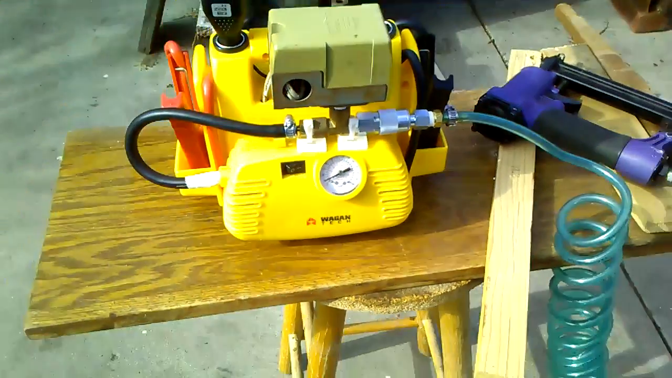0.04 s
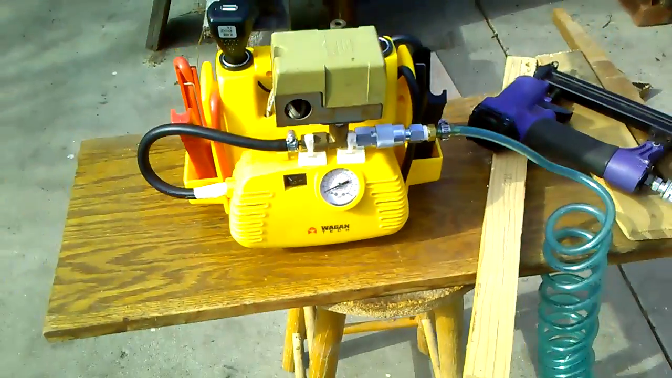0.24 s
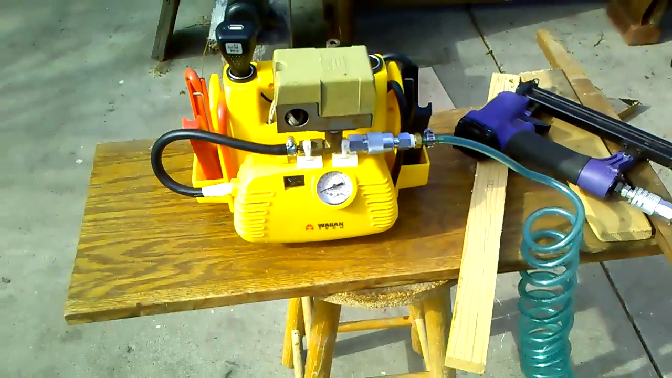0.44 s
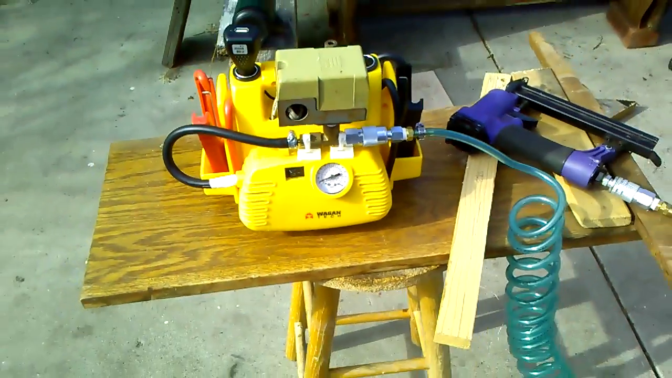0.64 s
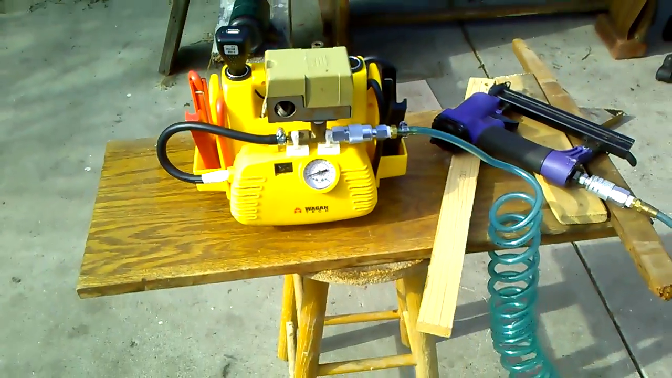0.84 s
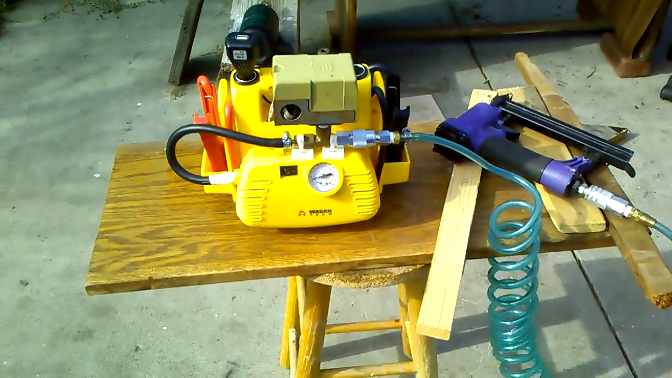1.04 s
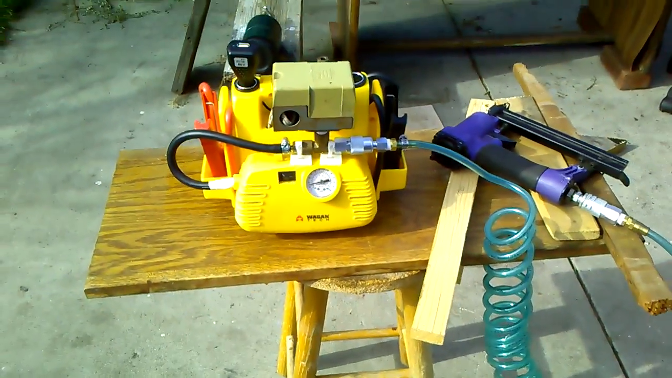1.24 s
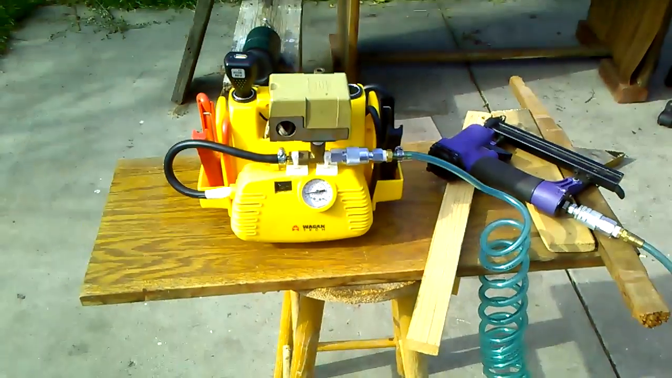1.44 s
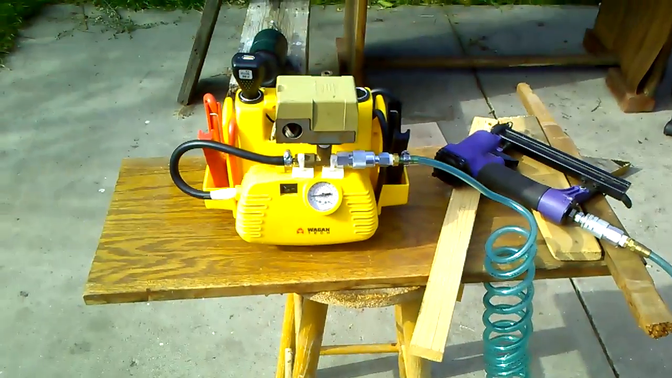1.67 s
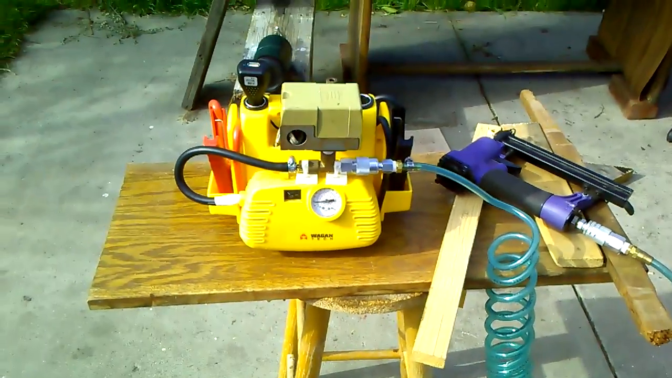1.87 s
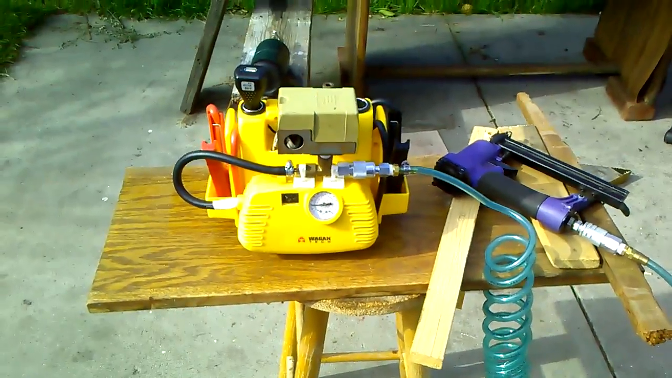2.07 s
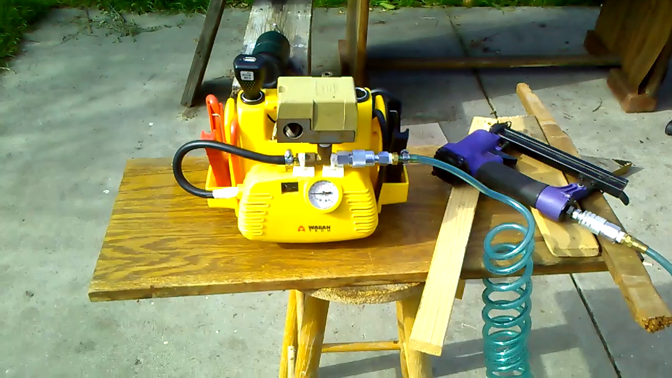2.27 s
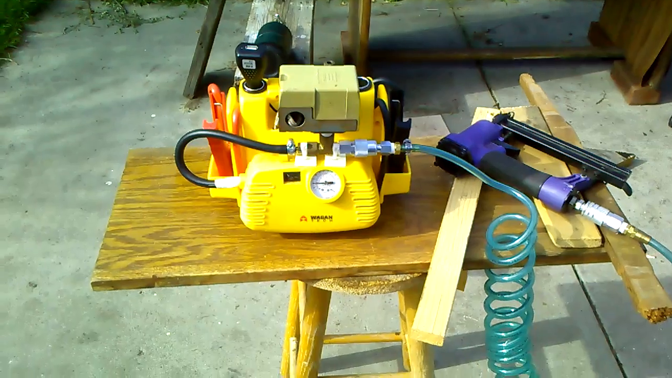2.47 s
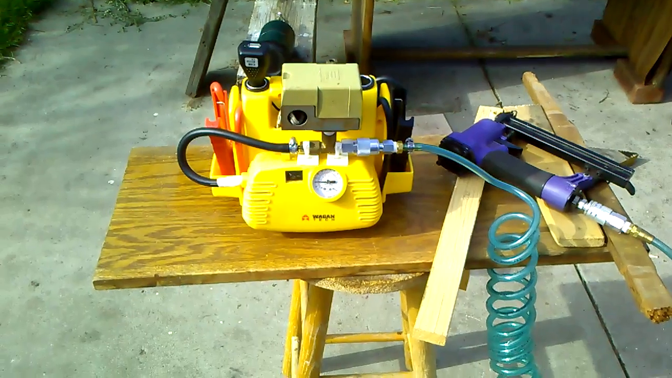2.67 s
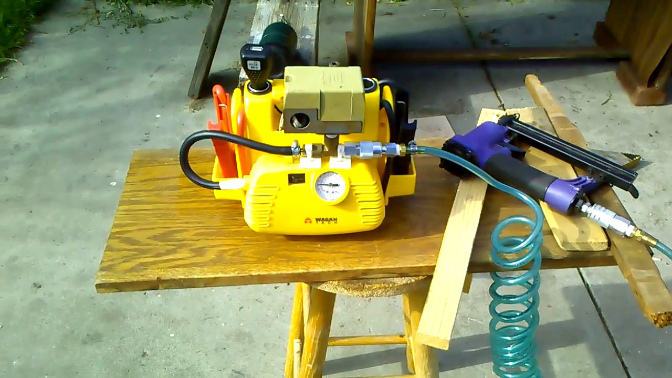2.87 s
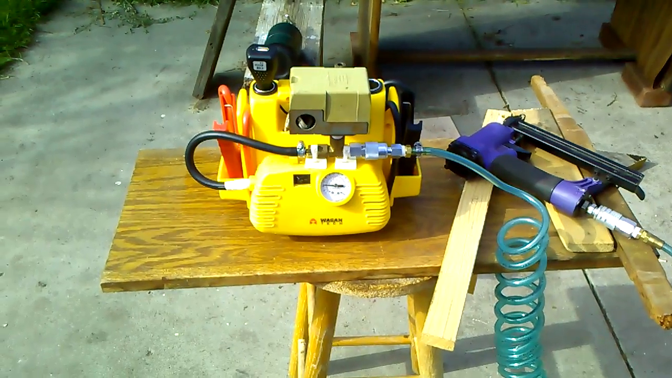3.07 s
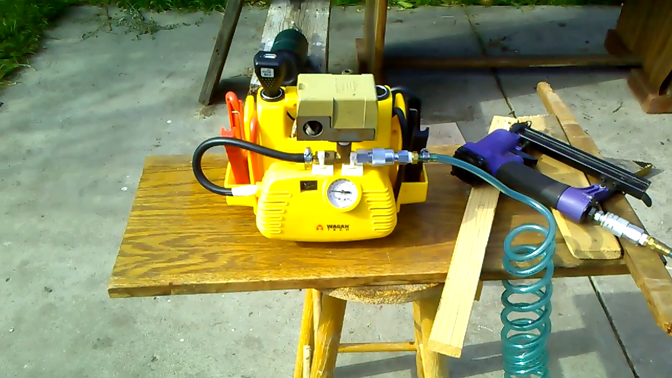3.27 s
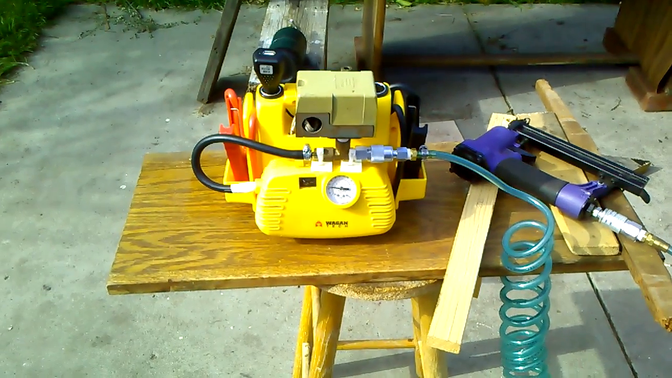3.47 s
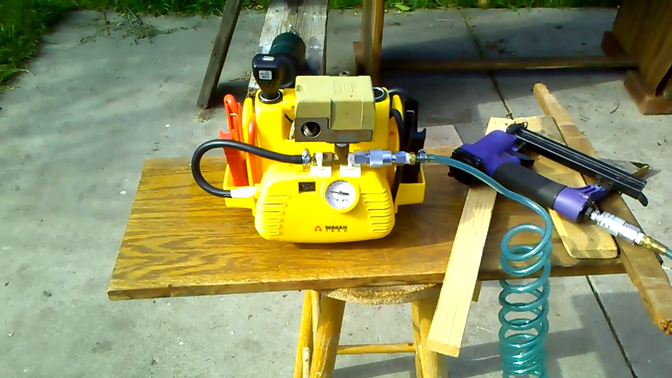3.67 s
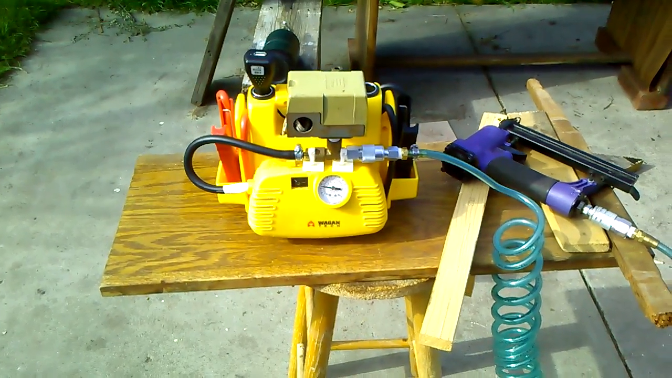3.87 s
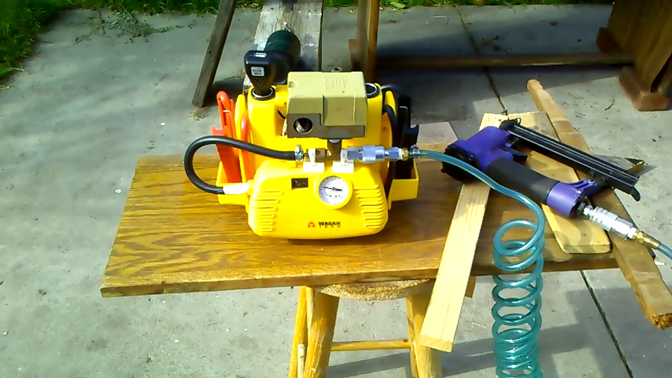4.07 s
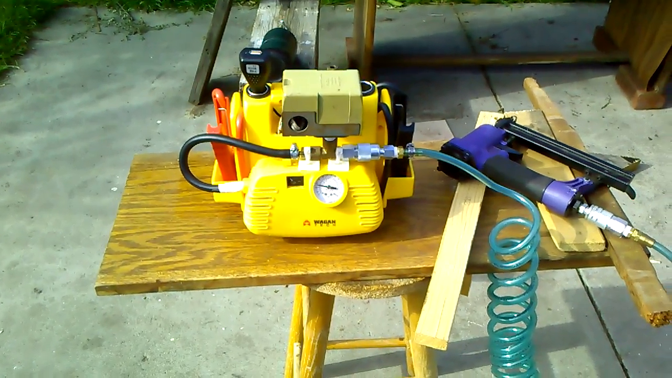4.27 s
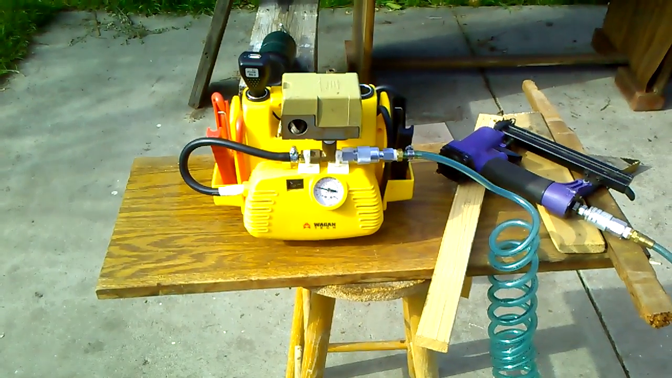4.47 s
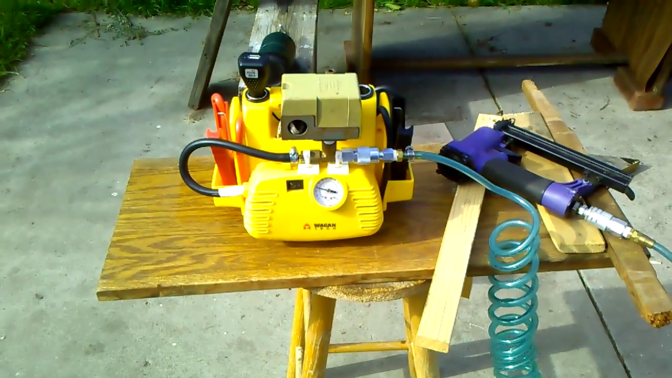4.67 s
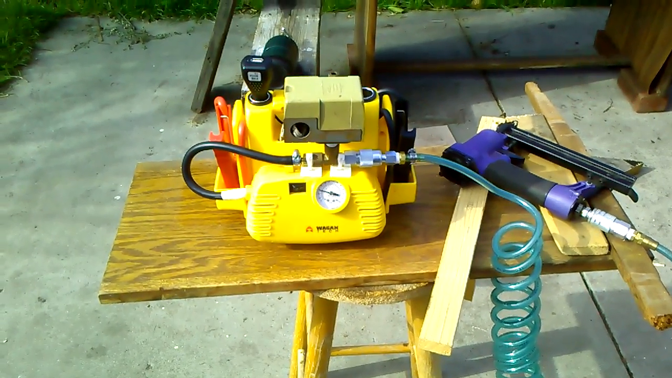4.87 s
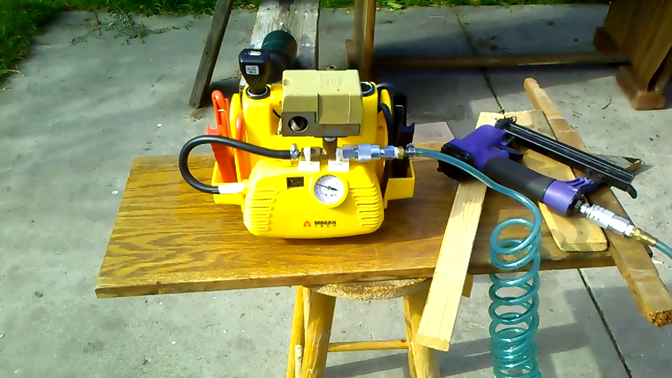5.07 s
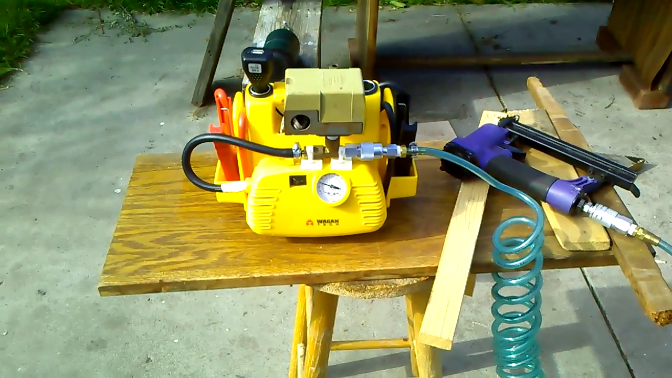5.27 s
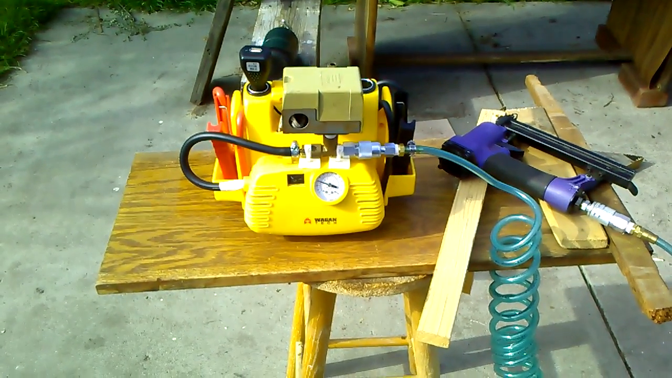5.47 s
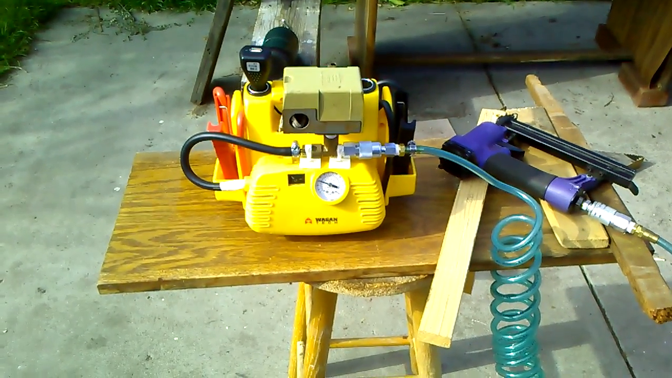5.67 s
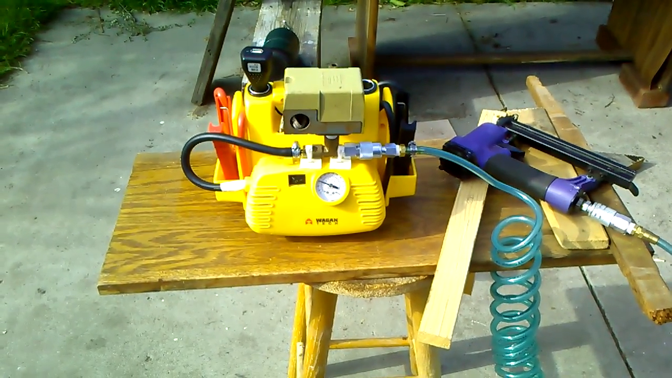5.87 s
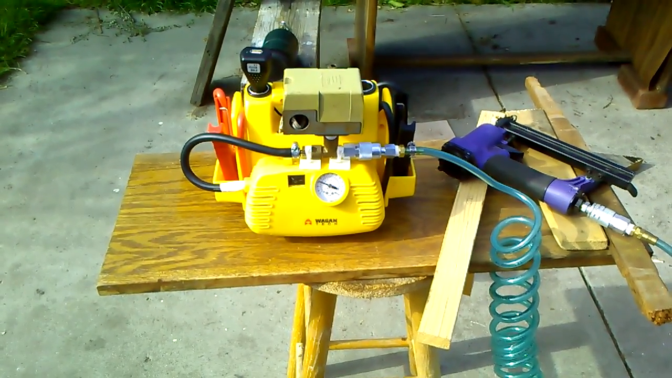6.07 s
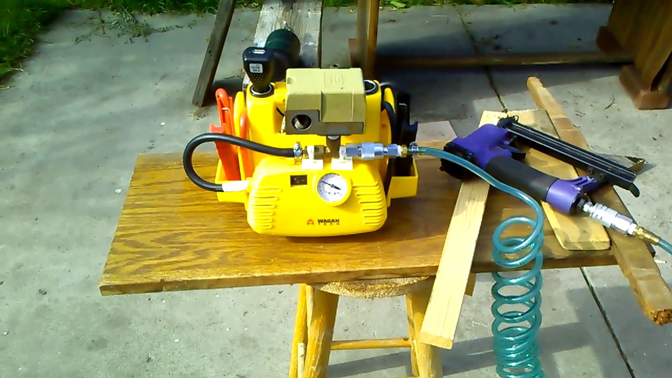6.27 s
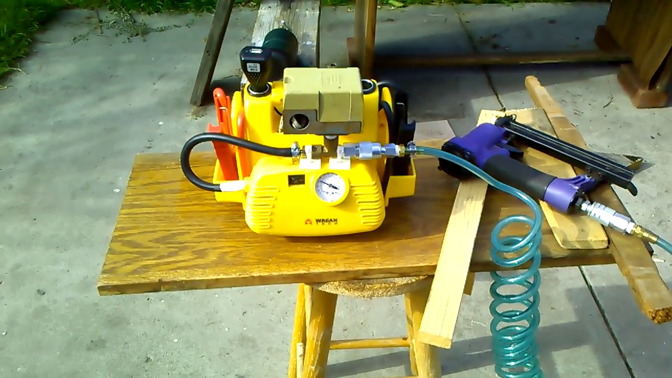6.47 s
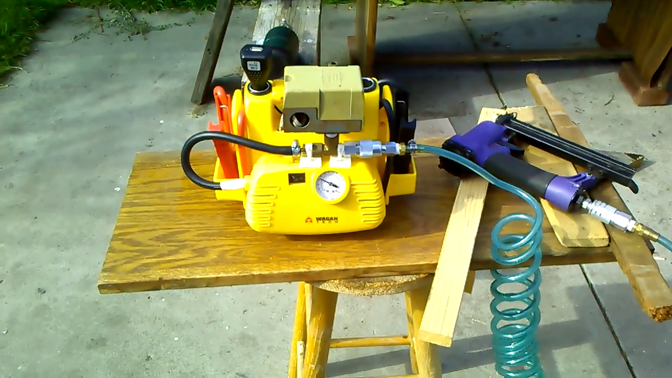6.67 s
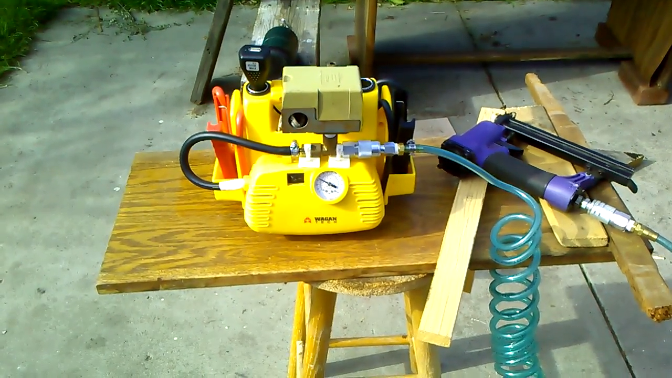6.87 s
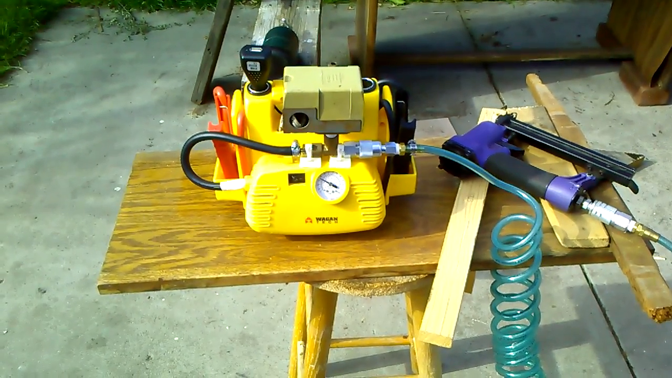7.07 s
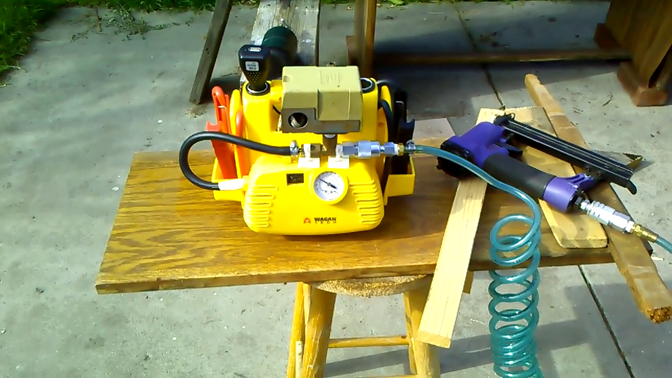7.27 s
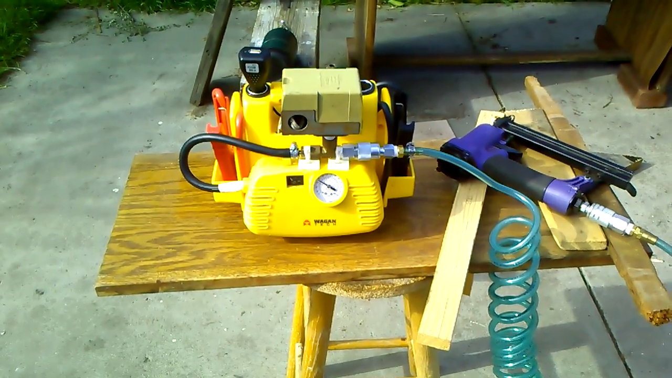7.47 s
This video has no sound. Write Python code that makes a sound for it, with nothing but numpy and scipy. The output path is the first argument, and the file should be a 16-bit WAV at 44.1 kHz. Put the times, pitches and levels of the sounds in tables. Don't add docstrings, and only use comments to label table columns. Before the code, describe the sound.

Outdoors, a little geared compressor runs nonstop with a rapid clacking drone, hollow knocking and gear whine, slowing slightly as pressure builds.

```python
import sys
import numpy as np
from scipy import signal
from scipy.fft import rfft, irfft
from scipy.io import wavfile
from scipy.ndimage import uniform_filter1d

SR = 44100
rng = np.random.default_rng(int(sys.argv[2]) if len(sys.argv) > 2 else 0)


def persist_wave(psi):
    counts = np.round(np.clip(psi, -1, 1) * 32767).astype(np.int16)
    wavfile.write(sys.argv[1], SR, np.atleast_2d(counts).T)


def volts_from_decibels(level):
    exponent = np.asarray(level, float) / 20
    return 10 ** exponent


N = 332514
T = np.arange(N) / SR
TEETH, RATIO, POLES = 48, 4.8, 3


def evened(x):
    return x / np.sqrt(np.mean(x ** 2) + 1e-20)


def steadied(x):
    power = uniform_filter1d(uniform_filter1d(x ** 2, size=9000), size=9000)
    return x / np.sqrt(power + 1e-20)


def over_time(rows):
    s, value = np.transpose(rows)
    return np.interp(T, s, value)


def over_pitch(points, hz):
    f, db = np.transpose(points)
    return np.interp(np.log(hz + 1), np.log(f + 1), db)


def colour(x, db):
    log_gain = np.log(volts_from_decibels(np.maximum(db, -100)))
    whole = np.r_[log_gain, log_gain[-2:0:-1]]
    taps = np.fft.ifft(np.exp(whole - 1j * signal.hilbert(whole).imag)).real
    return signal.oaconvolve(x, taps[:2048])[:N]


def swell(t, rise_ms, fall_ms):
    return np.exp(-.5 * (1000 * t / np.where(t < 0, rise_ms, fall_ms)) ** 2)


def per_turn(passing, spread):
    return spread * rng.standard_normal(400)[passing]


# (time [s], speed [turns/s])
SPEED = [
    (0, 45.73),
    (.9, 44.712),
    (2.2, 43.462),
    (3, 42.886),
    (4, 42.204),
    (5.1, 41.524),
    (6, 41.156),
    (6.8, 40.734),
    (7.54, 40.848),
]


def crank():
    speed = over_time(SPEED)
    return .354 + np.cumsum(speed) / SR, speed


def state():
    speed = uniform_filter1d(over_time(SPEED), size=20000, mode="nearest")
    pressure = (speed[0] - speed) / (speed[0] - speed.min())
    late = np.clip((pressure - .8) / (1 - .8), 0, 1)
    slack = np.clip(np.minimum(T - 2.3, 6.55 - T) / .2 + .5, 0, 1)
    return pressure, late, slack


def rule(start, pressure=0, late=0, slack=0):
    return start + np.dot((pressure, late, slack), state())


def valve_delay():
    return rule(-.01, pressure=.012, late=.053)


def since(turns, speed, angle, jitter):
    passing = np.round(turns - angle).astype(int)
    off = per_turn(passing, jitter)
    return passing, (turns - angle - passing - off) / speed


# (time [s], peak level [dB])
GUSTS = [
    (1.619, -49),
    (2.349, -43),
    (3.129, -39),
    (4.049, -45),
    (4.719, -47),
    (5.739, -44),
    (6.202, -45),
]


def wind():
    band = signal.butter(2, [11, 60], "band", fs=SR, output="sos")
    rumble = evened(signal.sosfilt(band, rng.standard_normal(N)))
    puffs = sum(volts_from_decibels(db - 6.5) * np.exp(-.5 * ((T - s - .025) / 0.019) ** 2) for s, db in GUSTS)
    lumps = evened(signal.resample(rng.standard_normal(40), N))
    return rumble * (puffs + volts_from_decibels(-62 + 3.5 * lumps))


# (order [cycles/turn], level [dB rms])
SHAKE = [(1, -60.5), (2, -62.5), (3, -63.5), (4, -64.5), (5, -67.5), (6, -67.5), (7, -58), (8, -58)]
# (frequency [Hz], level [dB per Hz])
ROAR = [(15, -16), (30, -8), (100, -8), (170, -4.5), (380, -3.5), (550, 9), (750, 9), (900, -1.5),
        (1300, -5.5), (1800, -37)]


def ground(turns):
    shake = sum(volts_from_decibels(db) * np.sqrt(2) * np.cos(2 * np.pi * order * turns) for order, db in SHAKE)
    roar = colour(rng.standard_normal(N), over_pitch(ROAR, np.fft.rfftfreq(4096, 1 / SR)))
    roar_db = -39 + 3.5 + 5 * np.exp(-T / 0.27)
    return shake + volts_from_decibels(roar_db) * evened(roar)


# (angle after the delay [turns], frequency [Hz], level [dB], t60 [ms])
PLATE = [
    (0.0367, 866, -1.5, 59),
    (0.0276, 1030, -3.5, 80),
    (0.0388, 1197, 5, 20),
    (0.1017, 1372, 10.5, 11.6),
    (-0.0045, 1720, 7, 33.7),
    (-0.0204, 2300, 9, 20.3),
]


def plate(turns, speed):
    out = np.zeros(N)
    delay = valve_delay()
    for angle, hz, db, t60_ms in PLATE:
        passing, t = since(turns, speed, angle + delay, .0009)
        size = volts_from_decibels(db + per_turn(passing, 0.8) - 60000 * abs(t) / t60_ms)
        attack = (t > 0) * (1 - np.exp(-abs(t) / 0.00038))
        out += size * attack * np.sin(2 * np.pi * hz * t)
    passing, t = since(turns, speed, 0.594, 0.00096)
    thin_level = 1.1 * volts_from_decibels(-3.5 * T) * np.exp(-.5 * (t / 0.006) ** 2)
    phase = 4 * np.pi * TEETH * (turns - passing) + per_turn(passing, .7)
    return evened(out) + thin_level * np.cos(phase)


# (angle after the delay [turns], dull level [dB], bright level [dB], ring-out [ms])
VALVE = [
    (-.025, 4, -2, .9),
    (.04, 0, -3, .9),
    (.085, -6, 1, 1.4),
    (.15, -9, -5, 2),
]
# (angle after the rebound [turns], dull level [dB], bright level [dB], ring-out [ms])
REBOUND = [
    (0, -18, -3, 1.2),
    (.04, -18, 0, 1.6),
    (.09, -18, -5, 2),
]
# (angle [turns], dull level [dB], bright level [dB], ring-out [ms])
ROD = [
    (.36, -8, -15, 1.3),
    (.5, -11, -22, 1.6),
    (.62, -9, -21, 1.8),
    (.76, -9, -25, 1.5),
]
# (frequency [Hz], level [dB per Hz])
CLATTER_NEAR = [(530, -35.5), (900, -4.5), (1260, -14), (1660, -3), (1970, -8), (2190, -7), (3140, -14.5),
                (4450, -12.5), (4960, -11.5), (11800, -13.5), (15900, -18)]
CLATTER_FAR = [(530, -23), (900, -7), (1290, -18), (1420, -6.5), (1580, -9), (1940, -3.5), (2820, -11.5),
               (3950, -11.5), (5200, -10.5), (6540, -12.5), (8620, -16), (9600, -12.5), (15900, -20.5)]
# (frequency [Hz], width [Hz], level [dB])
RINGS_NEAR = [(2700, 430, -4), (3440, 480, -3), (4330, 80, 1), (4680, 110, 0), (5300, 300, -3),
              (6280, 390, -4), (9460, 460, -6), (10360, 200, -9), (11100, 520, -8), (15500, 320, -10)]
RINGS_FAR = [(2620, 300, -6), (3434, 80, -2), (4310, 60, -2), (4770, 60, -2), (6320, 200, -3),
             (7250, 200, -4), (9470, 450, -7), (10900, 290, -6), (15600, 160, -12), (15100, 260, -9)]


def clatter(turns, speed):
    delay = valve_delay()
    rebound = rule(.46, pressure=-.01, slack=-.035)
    rebound_db = rule(-2.5, pressure=4.9, late=-1, slack=-0.5)
    impacts = [(a + delay, *rest) for a, *rest in VALVE] + ROD
    impacts += [(a + rebound, dull_db, bright_db + rebound_db, ms) for a, dull_db, bright_db, ms in REBOUND]
    dull, bright = rng.standard_normal((2, N))
    dull = volts_from_decibels(-19.5) * dull
    bright = volts_from_decibels(-18 - 11 * ((turns - delay) % 1)) * bright
    for angle, dull_db, bright_db, ring_ms in impacts:
        passing, t = since(turns, speed, angle, .004)
        at = np.clip(t * SR, 0, 999).astype(int)
        habit = rng.standard_normal((400 // 25 + 2, 1000))
        age = passing / 25
        row, fade = age.astype(int), np.pi / 2 * (age % 1)
        alike = habit[row, at] * np.cos(fade) + habit[row + 1, at] * np.sin(fade)
        grit = 0.24 * alike + 0.15 * rng.standard_normal(N)
        rattle = grit * (1 - np.exp(-abs(t) / 0.000054)) * np.exp(-1000 * abs(t) / ring_ms)
        tick = 0.76 * (at == 0)
        pinion_db = 0.61 * np.cos(2 * np.pi * (RATIO * passing - .3))
        hit = (rattle + tick) * volts_from_decibels(per_turn(passing, 2.4) + pinion_db) * (t >= 0)
        dull = dull + volts_from_decibels(dull_db) * hit
        bright = bright + volts_from_decibels(bright_db) * hit
    low, high = [signal.butter(2, 5600, kind, fs=SR, output="sos") for kind in ("low", "high")]
    drive = signal.sosfilt(low, dull) - signal.sosfilt(high, bright)
    hz = np.fft.rfftfreq(4096, 1 / SR)
    views = []
    for tilt, rings in ((CLATTER_NEAR, RINGS_NEAR), (CLATTER_FAR, RINGS_FAR)):
        lift_db = sum((db + 15.5) / (1 + (2 * (hz - f) / width) ** 2) for f, width, db in rings)
        views.append(evened(colour(drive, over_pitch(tilt, hz) + 0.41 * lift_db)))
    far = np.clip(T / 5, 0, 1)
    return steadied((1 - far) * views[0] + far * views[1])


def whine(turns, speed, shaft):
    angle = rule(.745, pressure=-.045, late=.03)
    passing, t = since(turns, speed, angle, 0.0029)
    stretch = 1 + 0.26 * state()[1]
    load = swell(t, 1.9 * stretch, 1.5 * stretch) * volts_from_decibels(per_turn(passing, 0.5))
    wander = 0.06 * evened(uniform_filter1d(rng.standard_normal(N), size=900))
    wander += 0.05 * np.cos(2 * np.pi * RATIO * shaft)
    mesh = 2 * np.pi * (TEETH * shaft + wander)
    rattle = 1 + 0.037 * evened(uniform_filter1d(rng.standard_normal(N), size=30))
    song = np.cos(mesh) + 0.28 * np.cos(2 * mesh) + 0.16 * np.cos(3 * mesh)
    return steadied((load + 0.057) * rattle * song)


# (frequency [Hz], gain [dB])
HOUSING = [(400, 4), (500, 6.5), (620, 4.5), (720, 3.5), (790, 7), (850, -1.5), (920, -29), (1100, -2)]


def knocks(turns, speed, shaft):
    pressure, late, _ = state()
    angle = rule(.232, pressure=.03, late=-.07)
    hz = rule(690, pressure=-10, late=50)
    pinion_hz = rule(610, pressure=20, late=80, slack=50)
    first_db = rule(-13.5, pressure=10.5, late=-11, slack=1.1)
    small_db = rule(-27, pressure=9, late=4.5, slack=8)
    throb = np.maximum(rule(.45, late=-.37, slack=-.25), .07)
    throb = throb + .42 * np.exp(-((late - .4) / .2) ** 2)
    pinion = .04 + .47 * pressure - .78 * late ** 2
    blows = [(angle, 0, 1.9, 1.5, 0), (.055, first_db, 1, 1.2, 0),
             (.69, small_db - 2, 1.2, 1.1, 1), (.885, small_db, 1.2, 1, 0)]
    out = np.zeros(N)
    for at, db, rise_ms, fall_ms, loose in blows:
        passing, t = since(turns, speed, at, .0015)
        swing = 2 * np.pi * hz * (t + (at - np.mean(at)) / speed)
        stand = 2 * np.pi * (RATIO * passing + pinion)
        tooth = throb * np.cos(swing + stand + 2 * np.pi * (pinion_hz - hz) * t)
        firm_blow = np.cos(swing) + tooth
        loose_blow = (.4 + np.cos(stand)) * np.cos(swing)
        blow = loose_blow if loose else firm_blow
        out += volts_from_decibels(db + per_turn(passing, 0.8)) * swell(t, rise_ms, fall_ms) * blow
    torque = .72 + .28 * np.cos(2 * np.pi * (turns - .98))
    hum_phase = 2 * np.pi * (POLES * RATIO * shaft + rule(-.6, pressure=.55))
    out += volts_from_decibels(rule(-10.5, pressure=-1, late=-6)) * torque * np.cos(hum_phase)
    housing = volts_from_decibels(over_pitch(HOUSING, np.fft.rfftfreq(N, 1 / SR)))
    return steadied(irfft(rfft(out) * housing, N))


# (time [s], level [dB])
EFFORT = [
    (0, -21.5),
    (2, -25),
    (3, -23.5),
    (4.6, -27.5),
    (5.5, -24),
    (6.6, -22),
    (7.54, -23),
]


def scene():
    turns, speed = crank()
    pressure, late, _ = state()
    sag = .04 + .05 * pressure ** 2
    shaft = turns + sag / (2 * np.pi) * np.cos(2 * np.pi * (turns - .72))
    effort_db = over_time(EFFORT)
    whine_db = rule(-29, pressure=-1, late=0.05, slack=0.2)
    clatter_db = -28 + 4.5 * np.exp(-T / 2)
    plate_db = -34.5 + 0.76 * (effort_db - effort_db.mean()) - 1.5 * late
    machine = volts_from_decibels(effort_db) * knocks(turns, speed, shaft)
    machine += volts_from_decibels(whine_db) * whine(turns, speed, shaft)
    machine += volts_from_decibels(clatter_db) * clatter(turns, speed)
    machine += volts_from_decibels(plate_db) * plate(turns, speed)
    return (machine + ground(turns) + wind())[None]


def roll_off(x):
    return signal.sosfilt(signal.butter(12, 16380, fs=SR, output="sos"), x)


def record(dry):
    soft = 0.83 * np.tanh(dry / 0.76)
    band_limit = signal.firwin(511, 15900, fs=SR)[None]
    return roll_off(signal.oaconvolve(soft, band_limit, "same"))


dry = scene()
out = record(dry)
persist_wave(out)
```